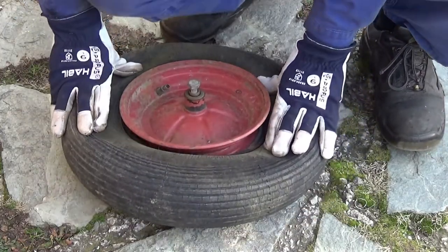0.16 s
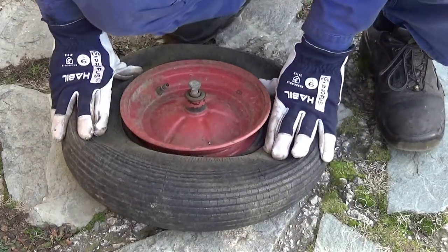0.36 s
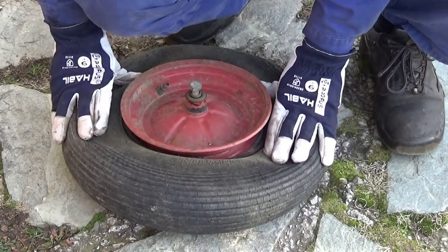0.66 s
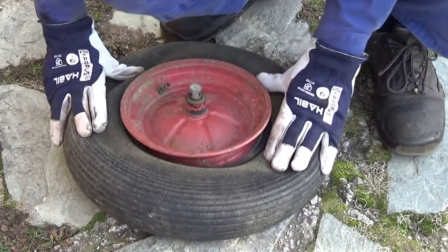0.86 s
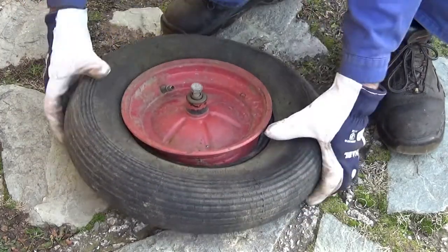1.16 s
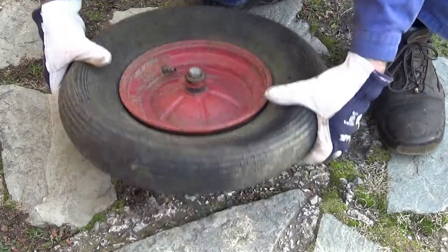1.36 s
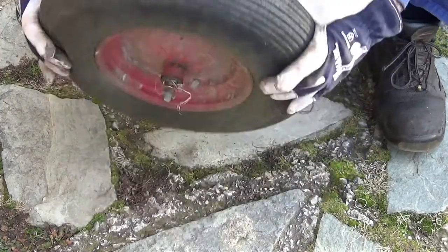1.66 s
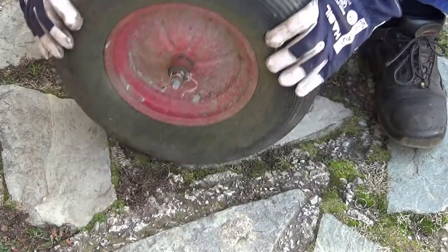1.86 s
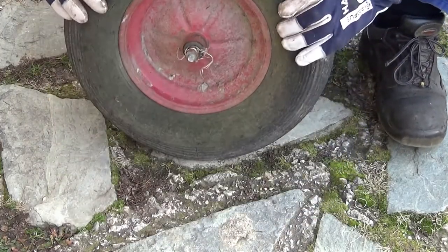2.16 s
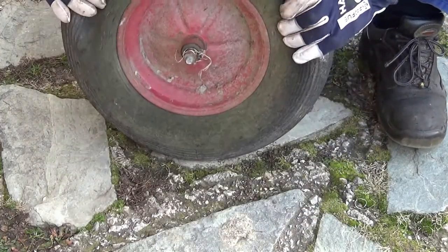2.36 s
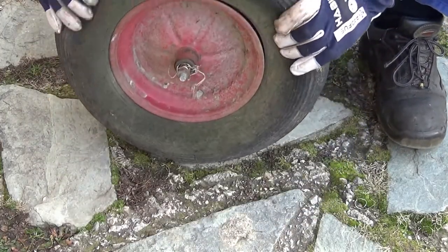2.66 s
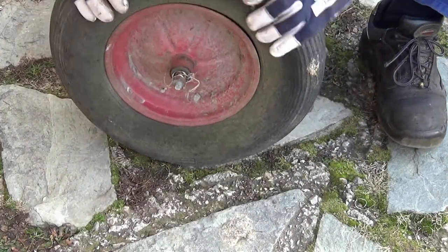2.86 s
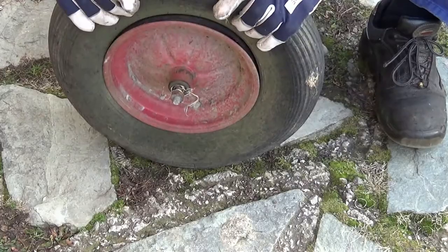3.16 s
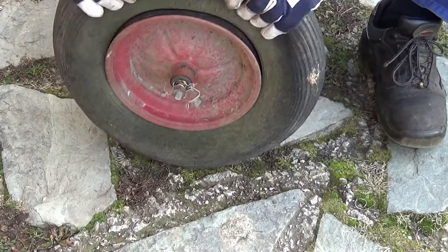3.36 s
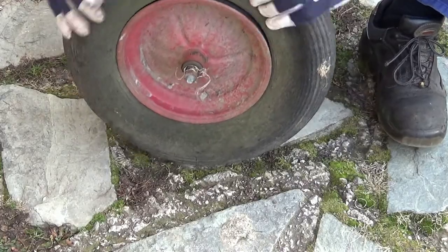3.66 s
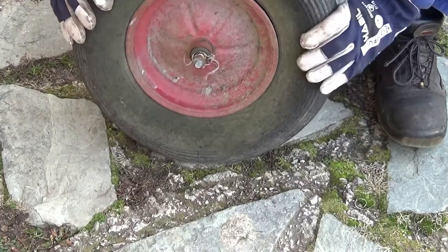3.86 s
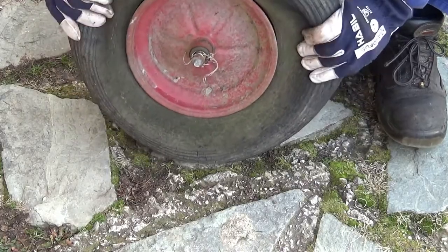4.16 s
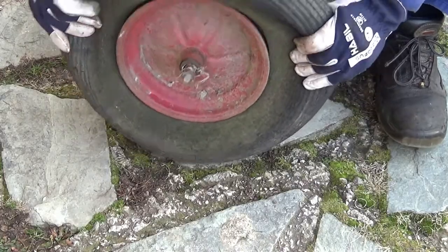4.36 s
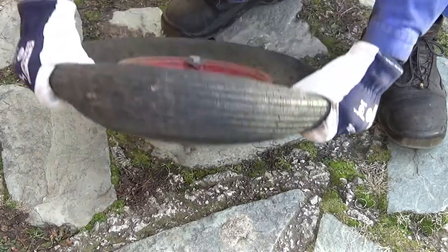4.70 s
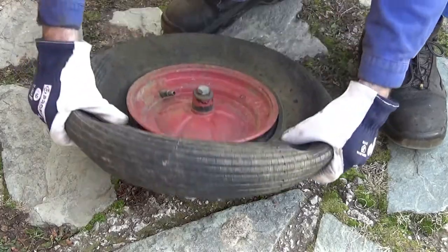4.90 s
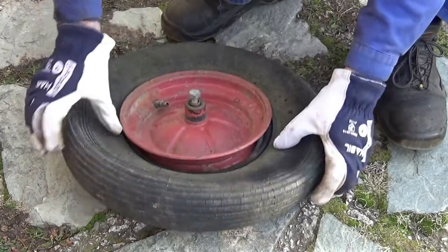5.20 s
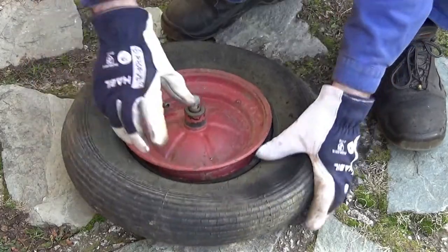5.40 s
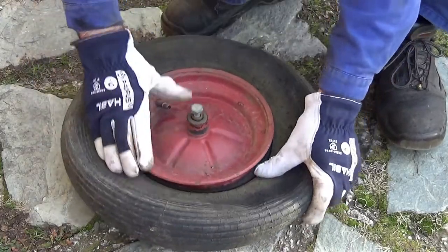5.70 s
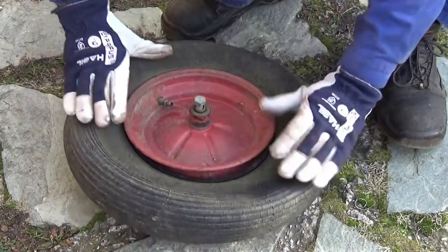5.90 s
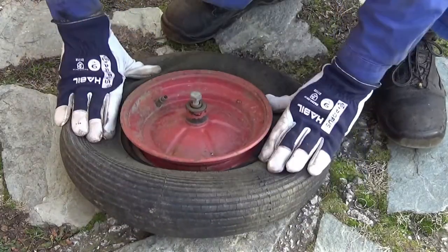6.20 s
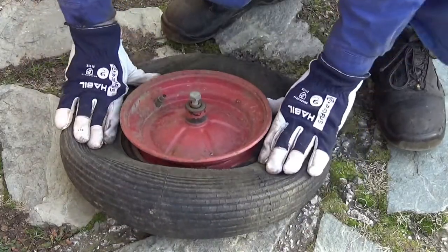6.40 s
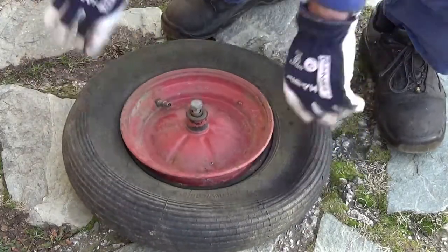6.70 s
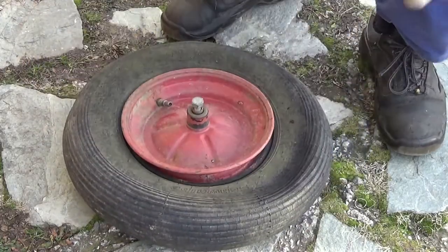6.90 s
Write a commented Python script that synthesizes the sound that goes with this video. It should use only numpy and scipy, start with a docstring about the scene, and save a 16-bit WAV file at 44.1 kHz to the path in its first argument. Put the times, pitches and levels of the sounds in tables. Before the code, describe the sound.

Outdoors, close to stone paving, a bright, sibilant hiss of air from a valve is already under way at 0 s, swells to its strongest around 0.5 s and fades by 0.9 s, dotted with tiny rubber pops. From 0.9 to 1.9 s gloves swish and rub on rubber, grit cracks sharply, and the steel rim clatters briefly near 1.2-1.3 and 1.75 s, with a high tinkle. Light rustling continues; a faint puff and scrape come at 2.5 s, another short scrape at 3.1 s, and grit cracks at 4.0 s. Turning back, the tyre bumps at 4.4 s and lands at 4.9 s with a loud slap, metallic clatter and a moderate hiss. Gloves rustle, the axle clicks around 5.5-5.6 s, and soft air puffs come at 6.1 and 6.4 s before handling fades by 6.8 s. A quiet steady wash and barely audible rapid high pips run throughout.

```python
"""Air hisses through the open valve stem of a wheelbarrow tyre as gloved hands squeeze it on stone paving.
Hiss: noise shaped by stem resonances and a broad jet. Gloves and sleeves: snagged noise, swelling with hand speed.
As the wheel is turned over and back, grit cracks (noise bursts), slack rubber pops and bumps (damped swings),
the axle knocks and the steel rim clatters (scrape noise and dying modes).
Behind: a quiet outdoor wash of shaped noise and a faint high pip, repeating regularly."""
import sys
import numpy as np
from scipy import signal
from scipy.fft import rfft, irfft, next_fast_len
from scipy.io import wavfile
from scipy.ndimage import uniform_filter1d

SR = 44100
rng = np.random.default_rng(int(sys.argv[2]) if len(sys.argv) > 2 else 0)


def master(y):
    """Save y as 16-bit WAV."""
    cut = np.clip(np.atleast_2d(y).T, -1, 1)
    pcm = np.round(cut * 32767)  # scale
    wavfile.write(sys.argv[1], SR, pcm.astype(np.int16))


N = 310905
T = np.arange(N) / SR
HIT_T = T[:SR // 3]  # time base of one short event

# steel on stone, spectrum: f/Hz, level/dB
SCRAPE_SPECTRUM = [(40, -25), (120, -10), (300, -9.5), (750, -0.5), (1050, 4.5), (1550, 2.5), (2200, 1.5),
                   (2950, -6.5), (3900, 2.5), (4800, -2), (5800, 2.5), (7500, -8), (10000, -12),
                   (16000, -32)]


def valve(top_hz=12000, top_width_hz=750, skirt=0.71, widening_per_db=0.0093, jet_growth=0.4,
          flutter_db=0.34, patchy_db=3.5, flow_db=0.75, dull_hz=14200):
    """Turbulence rings the valve stem; a harder push broadens the resonances and adds broad hiss."""
    # pushes: peak t/s, build/s, release/s, air flow/dB before flow_db,
    # lowest stem resonance at the peak: level/dB re flow, f/Hz, glide/Hz, width/Hz at -40 dB flow;
    # highest resonance/dB re stem
    pushes = [(0.532, 0.96, 0.37, -29, -8.5, 4030, 0, 422, -25),
              (2.49, 0.19, 0.14, -50, 4, 4000, 60, 560, -11),
              (2.535, 0.018, 0.018, -51.5, 15, 4350, 0, 480, -11),
              (3.175, 0.056, 0.11, -52, -2, 4030, 0, 500, -21),
              (3.44, 0.25, .105, -46, -1, 3960, 20, 600, -18),
              (4.31, 0.3, 0.16, -44.5, 2.5, 3840, -240, 420, -11),
              (4.58, 0.29, 0.44, -54, 2, 4000, 0, 330, -10),
              (4.87, .27, 0.17, -37.5, -4, 4040, 92, 290, -10),
              (6.11, .08, 0.13, -55, -1, 3700, 0, 450, -12),
              (6.365, 0.2, 0.15, -45.5, -2, 3800, 60, 430, -12)]
    # main stem resonances: f/Hz, width/Hz at -40 dB flow, level/dB
    stem = [(8490, 560, 1.5), (9120, 700, -3.5)]
    # broad jet hiss at peak flow: f/Hz, level/dB re stem
    jet_spectrum = [(150, -43), (700, -20.5), (1500, -24), (2500, -21), (3400, -14.5), (5200, -25),
                    (6200, -15.5), (7100, -45), (11300, -17), (13000, -26), (14000, -29), (16000, -66)]
    push_curve = 1.15  # exponent on the pressure arch
    low_fade_db = 1.5  # lowest resonance speaks first, gives way as the push goes on

    hz, t, z = signal.stft(rng.standard_normal(N), SR, nperseg=512, noverlap=384)
    hz = hz[:, None]
    power = np.zeros(z.shape)
    for s, build, release, push_db, low_db, low_hz, glide_hz, low_width_hz, top_db in pushes:
        pressure, progress = arch(t, s, build, release, push_curve)
        flow = push_db + 20 * np.log10(pressure + 1e-9)
        force = np.clip(flow + 40, -10, 15)  # dB re -40 dB flow
        widening = np.exp(widening_per_db * force)
        upper = sum(amp(db) ** 2 * resonance(hz, centre, width * widening, skirt)
                    for centre, width, db in stem)
        top = amp(top_db) ** 2 * resonance(hz, top_hz, top_width_hz * widening, skirt)
        lowest = resonance(hz, low_hz + glide_hz * progress, low_width_hz * widening, skirt)
        jet = amp(read(jet_spectrum, hz) + jet_growth * (flow - push_db)) ** 2
        low_gain = amp(low_db - low_fade_db * progress) ** 2
        shape = (upper + top + jet) / upper.mean(0) + low_gain * lowest / lowest.mean(0)
        power += amp(flow + flow_db) ** 2 * shape
    power /= 1 + (hz / dull_hz) ** 10  # highest treble dies away

    # eddies favour one narrow pitch after another: brief whistling streaks
    eddies = uniform_filter1d(rng.standard_normal(z.shape), size=2, axis=0)
    eddies = unit(uniform_filter1d(eddies, size=14, axis=1))
    streaked = z * np.sqrt(power) * unit(amp(patchy_db * eddies))
    air = signal.istft(streaked, nperseg=512, noverlap=384)[1][:N]
    return air * amp(flutter_db * wander(hz=220))


def resonance(hz, centre_hz, width_hz, skirt):
    """Power response of one resonance, 1 at its centre; skirt sets how steeply it falls."""
    return (1 + (2 * (hz - centre_hz) / width_hz) ** 2) ** (-2 * skirt)


def arch(t, peak_s, rise_s, fall_s, curve):
    """A hand's effort swells and eases off: gain, and progress from -1 through 0 at the peak to 1."""
    progress = np.clip((t - peak_s) / np.where(t < peak_s, rise_s, fall_s), -1, 1)
    return np.maximum(np.cos(np.pi / 2 * progress), 0) ** curve, progress


def gloves(rubber_db=-1.5, judder_db=1.5):
    """Fabric swishes over the tyre with each stroke; the rubber answers with a duller rub."""
    # strokes: t/s at the fastest, speeding up/s, slowing down/s, cloth/dB, rubber re cloth/dB before rubber_db
    strokes = [(.91, 0.076, 0.1, -51.5, 8.5), (0.989, 0.057, .062, -44, -0.5), (1.06, .07, 0.23, -63.5, 4),
               (1.235, .08, 0.076, -47, 1), (1.395, 0.053, 0.058, -50.5, -5),
               (1.465, 0.021, 0.022, -50, -1), (1.54, 0.09, 0.11, -53.5, 5.5),
               (1.65, 0.13, 0.11, -51.5, -1.5), (1.75, 0.11, 0.084, -45, -0.5),
               (1.91, 0.18, 0.15, -54.5, 0), (2.16, 0.044, 0.062, -57.5, 1), (2.23, 0.039, 0.12, -50, 0.5),
               (2.5, 0.21, 0.13, -52, -0.5), (2.665, 0.11, 0.12, -48.5, -3),
               (2.82, 0.12, 0.096, -44.5, -13), (2.91, .07, 0.087, -52, -2.5), (3.29, 0.081, .2, -56, -2),
               (3.52, 0.042, 0.056, -51.5, -3.5), (3.645, .13, 0.15, -45, -2.5),
               (3.775, .04, 0.033, -57, 8), (3.825, 0.035, 0.069, -51.5, -18),
               (3.965, 0.033, 0.093, -53.5, -4), (4.06, 0.08, 0.066, -50.5, -1),
               (4.27, 0.29, 0.16, -52.5, -21), (4.422, 0.027, 0.036, -47.5, -1.5),
               (4.515, 0.076, .11, -53, 2), (5.03, 0.22, 0.1, -51, 0.5), (5.15, 0.055, 0.059, -43.5, -12),
               (5.185, 0.045, 0.057, -50.5, 3.5), (5.386, 0.014, 0.026, -57, -10),
               (5.435, .025, 0.043, -57, 3), (5.56, 0.057, 0.064, -55.5, 6.5), (5.7, 0.13, 0.13, -52, -1),
               (5.8, 0.091, 0.06, -49.5, -0.5), (5.938, 0.029, .05, -52, -10),
               (5.98, 0.047, 0.032, -50, 1.5), (6.1, 0.072, .08, -53, 5), (6.27, 0.19, .3, -60.5, 5),
               (6.59, 0.13, 0.082, -51, 1)]
    # steady restless grip: start/s, end/s, cloth/dB, rubber re cloth/dB before rubber_db
    grip = (-1, 7.5, -64, 3)
    # cloth spectrum: f/Hz, level/dB
    cloth_spectrum = [(60, -45), (900, -30), (2200, -9), (3000, -3), (3700, 0.5), (4900, 0.5), (5900, -1),
                      (7400, -3.5), (9700, 0.5), (11500, -7), (13500, -13.5), (16000, -24)]
    # rubber spectrum: f/Hz, level/dB
    rubber_spectrum = [(40, -58), (100, -15.5), (170, -7), (400, -5.5), (750, -2), (1100, -2), (1700, 4.5),
                       (2400, -1.5), (3500, -2), (8000, -34.5)]
    rub_curve = 1.49  # exponent on the hand-speed arch

    start, end, grip_db, grip_body_db = grip
    cloth_power = amp(grip_db) ** 2 * ((T > start) & (T < end))
    rubber_power = cloth_power * amp(grip_body_db) ** 2
    for s, rise, fall, db, body_db in strokes:
        stroke_t = np.arange(0, rise + fall, 1 / SR)
        speed = arch(stroke_t, rise, rise, fall, rub_curve)[0]
        add(cloth_power, s - rise, (speed * amp(db)) ** 2)
        add(rubber_power, s - rise, (speed * amp(db + body_db)) ** 2)

    cloth = friction(per_s=1500, spread_db=2.5, snag_share=0.4)
    cloth = colour(cloth, cloth_spectrum, band=(5000, 7500))
    rubber = friction(per_s=400, spread_db=2, snag_share=0.28)
    rubber = colour(rubber, rubber_spectrum, band=(1100, 2400))
    rubber *= amp(rubber_db + judder_db * wander(hz=90))  # stick and slip
    cloth *= amp(judder_db * wander(hz=60))
    return np.sqrt(cloth_power) * cloth + np.sqrt(rubber_power) * rubber


def friction(per_s, spread_db, snag_share):
    """Smooth sliding noise with sparse snags of uneven size."""
    size = amp(spread_db * np.minimum(rng.exponential(1, N), 3))
    snags = rng.choice([-1, 1], N) * size * (rng.random(N) < per_s / SR)
    share = np.clip(snag_share, 0, 1)  # of the power
    return np.sqrt(share) * unit(snags) + np.sqrt(1 - share) * rng.standard_normal(N)


def grit(tail_db=-21, tail_t60_s=0.11):
    """Each grain under the tread cracks sharply, crumbles briefly and rings the rim."""
    # grains: t/s, level/dB, t60/s, tilt/(dB/octave above 500 Hz), rim ring/dB re crack
    grains = [(0.9236, -22.5, 0.036, 1, -37), (0.9395, -23.5, 0.02, -2.5, -31), (.968, -30.5, .02, 4, -30),
              (1.194, -32, .03, -11.5, -17), (1.224, -26.5, .012, -2, -25), (1.246, -24.5, .006, -1.5, -30),
              (1.282, -30.5, 0.015, 8, -33), (1.33, -32, 0.017, 2, -20), (2.035, -39, 0.026, -5, -20),
              (2.207, -34.5, .018, -3, -12), (2.273, -35, 0.013, -11, -18),
              (2.3237, -27.5, 0.017, 0.5, -16), (2.798, -28, .0056, -4, -32),
              (2.818, -30.5, 0.014, -2.5, -30), (3.823, -34.5, .035, 2, -28), (3.839, -35, .017, 11, -32),
              (4.0392, -21, 0.012, -4, -20), (4.1438, -28.5, 0.017, -6, -16), (4.883, -33, .012, -1, -30),
              (5.4204, -37.5, 0.032, -5, -16), (5.6706, -37, .006, 4, -26), (6.0998, -32.5, .019, -8, -22),
              (6.1292, -29, 0.018, -3, -13), (6.163, -34, .022, -4, -20), (6.6884, -37.5, 0.013, -7, -12),
              (6.7774, -43, 0.014, -1, -25)]
    # grit on stone, spectrum: f/Hz, level/dB
    stone_spectrum = [(60, -48), (350, -26.5), (800, -11), (1600, -6.5), (2800, -10.5), (3600, 8.5),
                      (4050, -3.5), (4500, 7.5), (5200, 0.5), (5850, 3.5), (7000, -4.5), (8000, -1.5),
                      (9000, 4.5), (10500, -2.5), (11500, -4.5), (16000, -41)]
    out = np.zeros(N)
    for s, db, t60, tilt, ring_db in grains:
        decay = amp(-60 * HIT_T / t60) + amp(tail_db - 60 * HIT_T / tail_t60_s)
        crack = colour(decay * rng.standard_normal(len(HIT_T)), stone_spectrum, tilt)
        add(out, s, amp(db) * (crack + amp(ring_db) * rim_ring(tilt=3.1)))
    return out


def tyre(pop_t60_s=0.0069, bump_cycles=15.5, landing_s=4.905, landing_db=-38):
    """Pops die at once, deeper bumps last longer; the landing tyre passes only a dull blow to the rim."""
    # small pops and slaps of the rubber: t/s, level/dB, f/Hz
    pops = [(.0145, -27.5, 1780), (.085, -36, 1800), (0.1553, -35, 1780), (0.218, -31.5, 1850),
            (0.226, -34, 1824), (.395, -37.5, 1800), (.48, -34.5, 1580), (1.277, -34, 665),
            (1.287, -35, 1810), (1.746, -32.5, 1140), (4.9025, -19, 656)]
    # bumps of the slack tyre: t/s, level/dB, f/Hz
    bumps = [(1.191, -54, 295), (1.289, -37, 830), (1.275, -37.5, 177), (1.288, -50, 159),
             (1.746, -48, 171), (2.534, -47, 317), (3.119, -60, 158), (4.416, -40.5, 322),
             (4.418, -47, 188), (4.506, -41.5, 185), (4.951, -41.5, 208), (4.954, -36, 460),
             (5.027, -44, 420), (5.035, -50, 181), (5.076, -45.5, 234), (5.525, -54.5, 200),
             (5.777, -55, 168), (6.101, -46.5, 313)]
    out = np.zeros(N)
    for s, db, hz in pops:
        add(out, s, amp(db) * flop(hz, pop_t60_s))
    for s, db, hz in bumps:
        add(out, s, amp(db) * flop(hz, bump_cycles / hz))  # t60 as a count of swings
    add(out, landing_s, amp(landing_db) * rim_ring(tilt=-20))
    return out


def flop(hz, t60_s, rise_s=0.0005, flap=0.63):
    """Slack rubber swings for a few heavily damped cycles, with a noisy flap around the same pitch."""
    band = signal.butter(2, [hz / 2, min(hz * 2, SR / 3)], "band", fs=SR, output="sos")
    noise = unit(signal.sosfilt(band, rng.standard_normal(len(HIT_T))))
    swing = np.sqrt(2) * np.sin(2 * np.pi * hz * HIT_T) + flap * noise
    shape = (1 - np.exp(-HIT_T / rise_s)) * amp(-60 * HIT_T / t60_s)
    level = np.sqrt(np.mean(shape ** 2)) / shape.max()
    return unit(signal.sosfilt(band, swing * shape)) * level


def wheel(ring_trim_db=-1.0, washer_hz=10330):
    """Steel grinds briefly on stone and the rim rings on; the loose axle washer adds one high note."""
    # clatters: t/s, level/dB, rise/s, t60/s, tilt/(dB/octave above 500 Hz), ring re scrape/dB before ring_trim_db
    clatters = [(1.186, -35, 0.0091, 0.3, -3, 4.5), (1.287, -38.5, 0.00073, 0.19, -6.5, -5),
                (1.33, -41.5, 0.0016, 0.21, -3.5, 0.5), (1.743, -38.5, 0.0027, 0.21, -3, -18),
                (2.532, -32, 0.0063, 0.022, 1.5, -2), (3.103, -31.5, 0.0026, .08, 5, -23),
                (3.111, -27.5, 0.0061, 0.11, .5, -12), (4.413, -42, 0.0056, 0.18, -7.5, -14),
                (4.922, -29, 0.0018, 0.018, -5.5, -6), (4.9298, -28, 0.0007, 0.037, 0.5, 3.5),
                (4.934, -28, 0.00065, 0.039, 1, 2.5), (4.951, -36.5, 0.0016, 0.16, -12.5, 8.5)]
    # washer tinkles: t/s, level/dB, t60/s
    tinkles = [(1.332, -28.5, 0.091), (4.51, -34, .08), (4.923, -23.5, 0.02)]
    out = np.zeros(N)
    for s, db, rise, t60, tilt, ring_db in clatters:
        swell = np.minimum(HIT_T / rise, 1)
        decay = amp(-60 * np.maximum(HIT_T - rise, 0) / t60)
        contact = swell * decay * rng.standard_normal(len(HIT_T))
        scrape = colour(contact, SCRAPE_SPECTRUM, tilt)
        ring = amp(ring_db + ring_trim_db) * swell * rim_ring()
        add(out, s, amp(db) * (scrape + ring))
    for s, db, t60 in tinkles:
        add(out, s, amp(db - 60 * HIT_T / t60) * np.sin(2 * np.pi * washer_hz * HIT_T))
    return out


def rim_ring(tilt=0, split=0.0194, count=3):
    """The rim's dying modes; the tyre's grip splits each into a close cluster, different at every blow."""
    # steel rim modes: f/Hz before the split, level/dB before tilt, t60/s
    rim_modes = [(502, -10.5, 0.27), (688, 0, 0.12), (840, -2, 0.066), (1605, -25, 0.69), (2154, 5.5, 0.17),
                 (2110, -5, 0.076), (2310, 8, 0.065), (2380, -1, 0.23), (2618, 6.5, 0.051),
                 (3070, -0.5, 0.035), (3380, -1, 0.15), (3870, -0.5, 0.087), (4020, 4, 0.11),
                 (4500, -4, 0.07)]
    hz, db, t60 = np.repeat(rim_modes, count, axis=0).T[:, :, None]
    gain = amp(db + tilt * np.log2(hz / 2000))  # tilt in dB/octave
    hz = hz * (1 + split * rng.standard_normal(hz.shape))
    phase = 2 * np.pi * (hz * HIT_T + rng.random(hz.shape))
    ring = gain * amp(-60 * HIT_T / t60) * np.sin(phase)
    return ring.sum(0) * np.sqrt(2) / np.linalg.norm(gain)  # rms about 1 before decay


def axle(click_db=-2, click_t60_s=0.012):
    """The axle knocks in its loose bearing: a dry click and a short ring of its modes."""
    # knocks: t/s, level/dB
    knocks = [(2.421, -37), (3.777, -41), (5.526, -39.5), (5.6073, -33.5), (5.643, -41.5)]
    # axle modes: f/Hz, level/dB, t60/s
    axle_modes = [(1494, -3.5, .06), (2340, -3, 0.044), (3760, 1, 0.033), (5450, -6.5, 0.044)]
    out = np.zeros(N)
    hz, db, t60 = np.transpose(axle_modes)[:, :, None]
    for s, knock_db in knocks:
        phase = 2 * np.pi * (hz * HIT_T + rng.random(hz.shape))
        ring = (amp(db - 60 * HIT_T / t60) * np.sin(phase)).sum(0)
        ring *= np.sqrt(2) / np.linalg.norm(amp(db))
        burst = amp(click_db - 60 * HIT_T / click_t60_s) * rng.standard_normal(len(HIT_T))
        add(out, s, amp(knock_db) * (colour(burst, SCRAPE_SPECTRUM) + ring))
    return out


def echo(x, t60_s):
    """Dense scatter from paving and nearby surfaces, as a decaying noise tail."""
    tail = rng.standard_normal(len(HIT_T)) * amp(-60 * HIT_T / t60_s) * (HIT_T > .002)
    return signal.fftconvolve(x, tail / np.linalg.norm(tail))[:N]


def open_air(wash_db=-54.5):
    """A soft, steady, distant wash with its echo off a wall, wide in the middle of its range."""
    # wash spectrum: f/Hz, relative density/dB
    wash_spectrum = [(25, -51), (50, -25), (72, -15), (105, -11.5), (150, -9.5), (220, -7.5), (420, -6),
                     (650, 0), (980, 0.5), (1400, -6.5), (2300, -11), (4000, -13.5), (9500, -18),
                     (16000, -27.5)]
    # stereo width: f/Hz, side re mid/dB
    wash_width = [(60, -35), (200, -24), (500, -12.5), (1000, -6), (3000, -3.5), (8000, -8), (14000, -41)]
    mid, side = (amp(wash_db) * colour(rng.standard_normal(N), wash_spectrum) for _ in range(2))
    return spread(bounce(mid, delay_s=.0139, share=0.49), side, wash_width)


def bounce(x, delay_s, share):
    """Adds one reflection, which ripples the spectrum."""
    f = np.fft.rfftfreq(N, 1 / SR)
    response = 1 + share * np.exp(-2j * np.pi * f * delay_s)
    return irfft(rfft(x) * response, N) / np.sqrt(1 + share ** 2)


def pips(pip_hz=2520, pip_db=-55.5, pip_s=.0042, period_s=.04):
    """A faint high tone pulses 25 times a second: a sine under a repeating bell-shaped envelope."""
    from_pulse = (T + .018) % period_s - period_s / 2
    return amp(pip_db) * np.exp(-(from_pulse / pip_s) ** 2) * np.sin(2 * np.pi * pip_hz * from_pulse)


def spread(mid, diffuse, width):
    """Left and right from a middle signal and a diffuse one of opposite sign in the two ears."""
    side = irfft(rfft(diffuse) * amp(read(width, np.fft.rfftfreq(N, 1 / SR))), N)
    return np.array([mid + side, mid - side])


def amp(db):
    """Decibels to gain."""
    return 10 ** (np.asarray(db) / 20)


def unit(x):
    """Scales to rms 1."""
    return x / np.sqrt(np.mean(x ** 2) + 1e-20)


def read(points, hz):
    """Interpolates a spectrum table on a log-frequency axis."""
    f, value = np.transpose(points)
    return np.interp(np.log(hz + 1), np.log(f + 1), value)


def add(mix, s, sound):
    """Mixes a sound in at time s."""
    part = mix[max(round(s * SR), 0):][:len(sound)]
    part += sound[:len(part)]


def colour(x, points, tilt=0, band=(0, SR)):
    """Causal filter from a spectrum table; white noise of rms 1 keeps rms 1, or that density in band/Hz."""
    size = next_fast_len(len(x) + 4096)
    hz = abs(np.fft.fftfreq(size, 1 / SR))
    gain = amp(read(points, hz) + tilt * np.log2(np.maximum(hz, 500) / 500))
    gain /= np.sqrt(np.mean(gain ** 2 * (hz >= band[0]) * (hz <= band[1])))
    response = np.exp(signal.hilbert(np.log(gain)))  # minimum phase
    return np.fft.ifft(np.fft.fft(x, size) * response).real[:len(x)]


def wander(hz):
    """Random motion of rms 1, mostly slower than hz."""
    f = np.fft.rfftfreq(N, 1 / SR)
    return unit(irfft(rfft(rng.standard_normal(N)) / (1 + (f / hz) ** 4), N))


def scene(echo_db=-16, left_db=0.15, bass_hz=105):
    """All the handling happens close by, just above the paving, over the open air and the pips."""
    # stereo width of the handling's echo: f/Hz, side re diffuse echo/dB
    yard_width = [(100, -49), (300, -34), (700, -14.5), (2000, -13.5), (4500, -17.5), (8000, -15),
                  (14000, -104)]
    near = valve() + gloves() + grit() + tyre() + wheel() + axle()
    high_pass = signal.butter(2, bass_hz, "high", fs=SR, output="sos")
    near = signal.sosfilt(high_pass, near)  # small things radiate little bass
    mid = near + amp(echo_db) * echo(near, t60_s=0.14)
    yard = spread(mid, echo(near, t60_s=0.16), yard_width)
    return (yard + open_air() + pips()) * amp([[left_db], [-left_db]])


def record(dry, edge_hz=15900):
    """Band limit: a steep linear-phase low-pass."""
    low_pass = signal.firwin(511, edge_hz, window=("kaiser", 9), fs=SR)
    return signal.oaconvolve(dry, low_pass[None], "same")


dry = scene()
out = record(dry)
master(out)
```